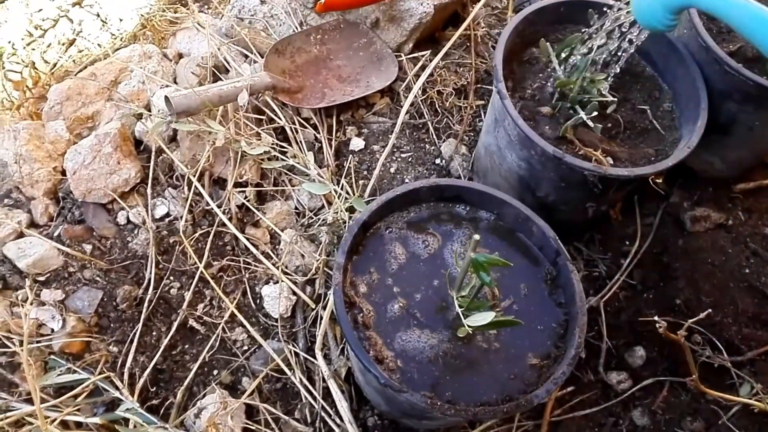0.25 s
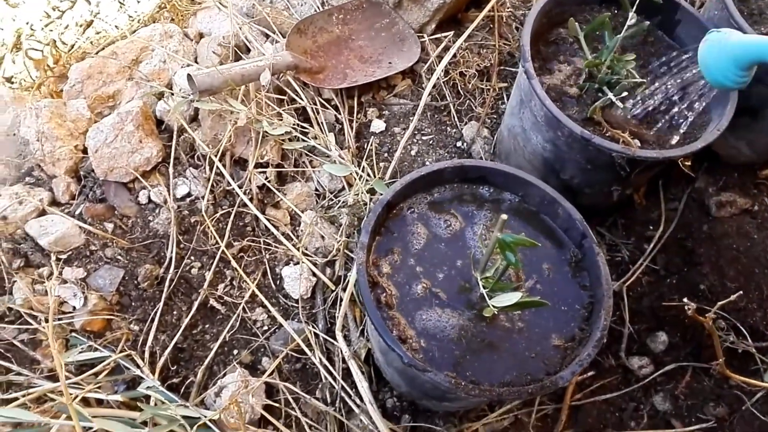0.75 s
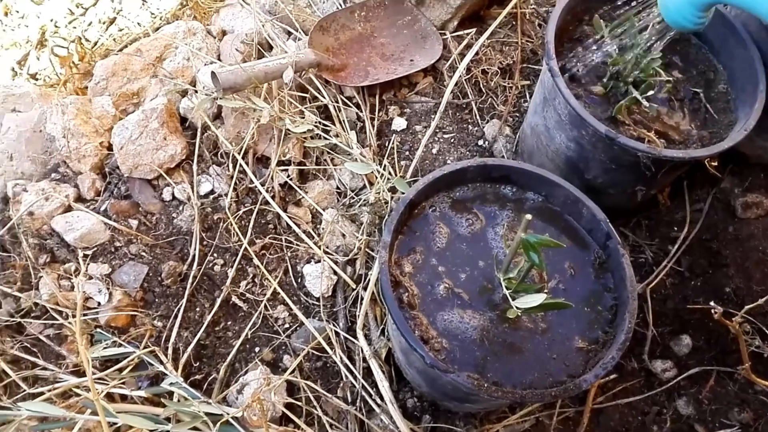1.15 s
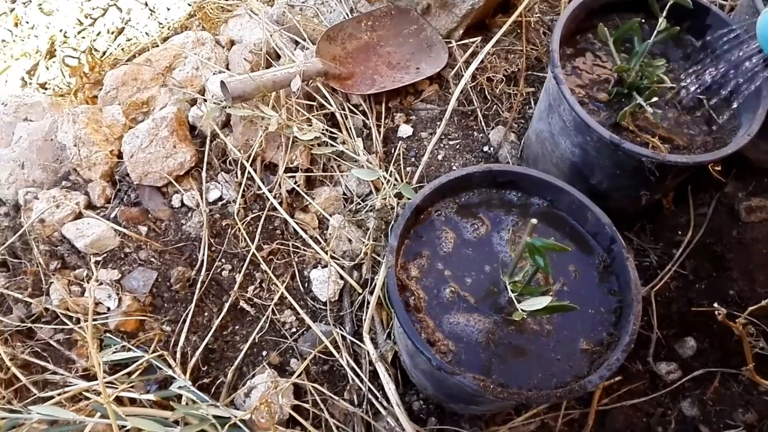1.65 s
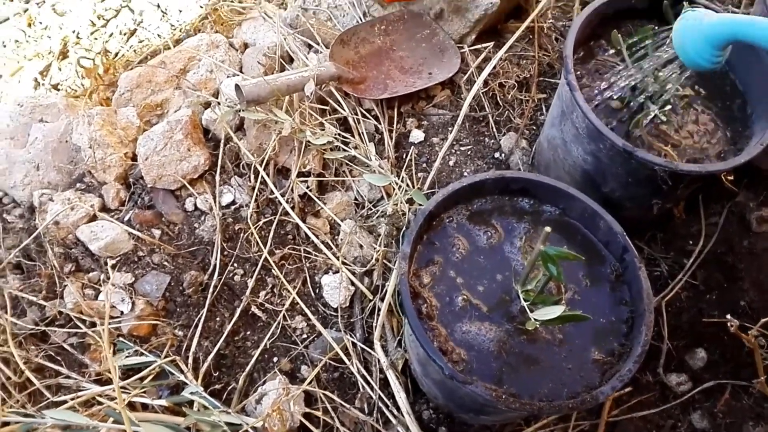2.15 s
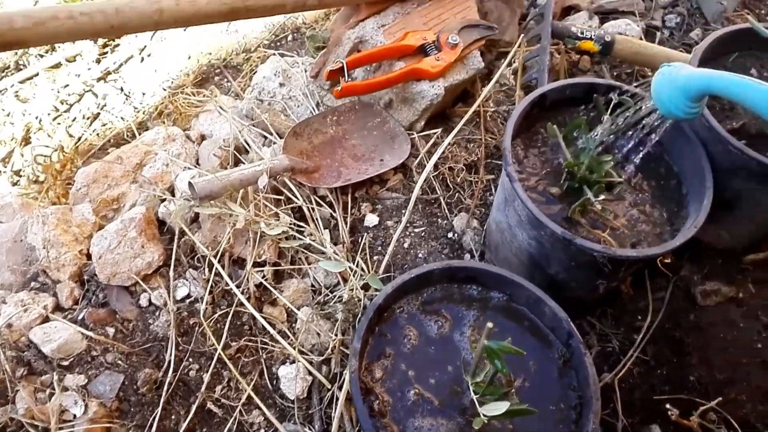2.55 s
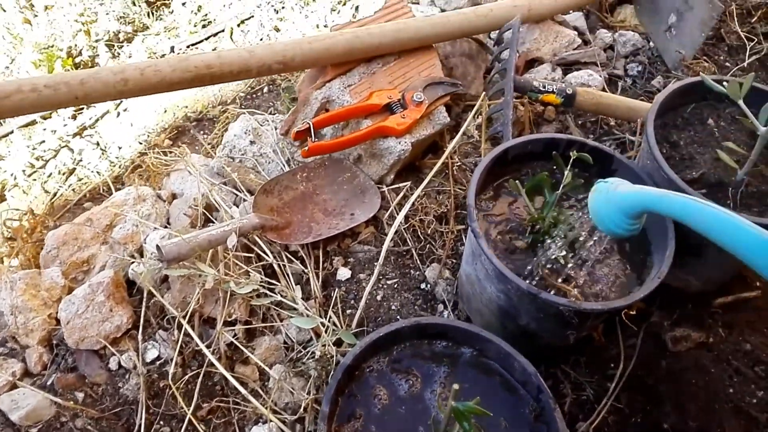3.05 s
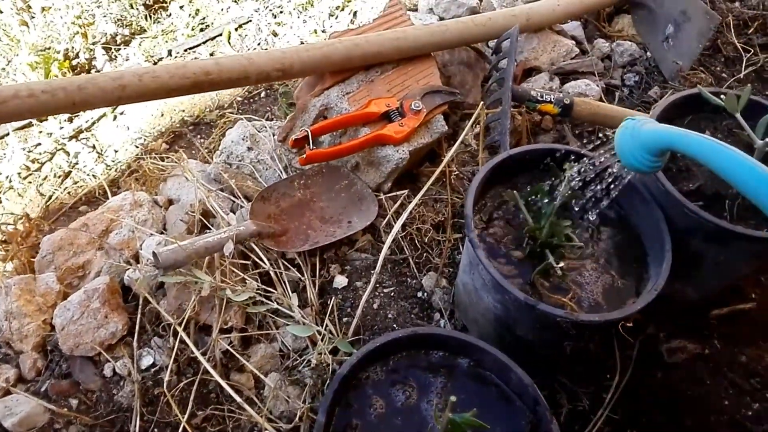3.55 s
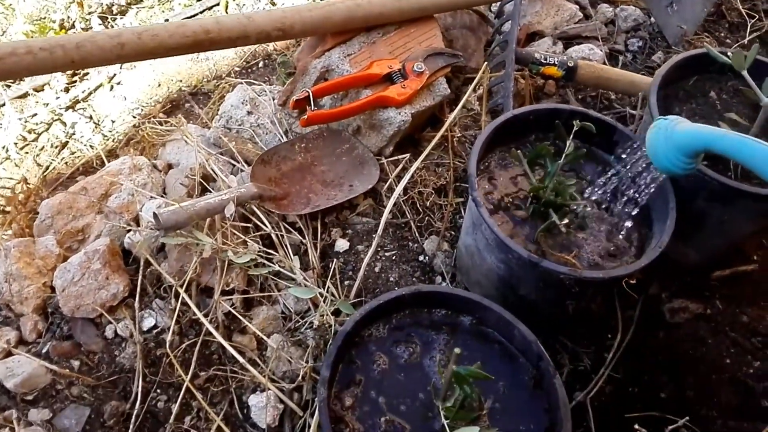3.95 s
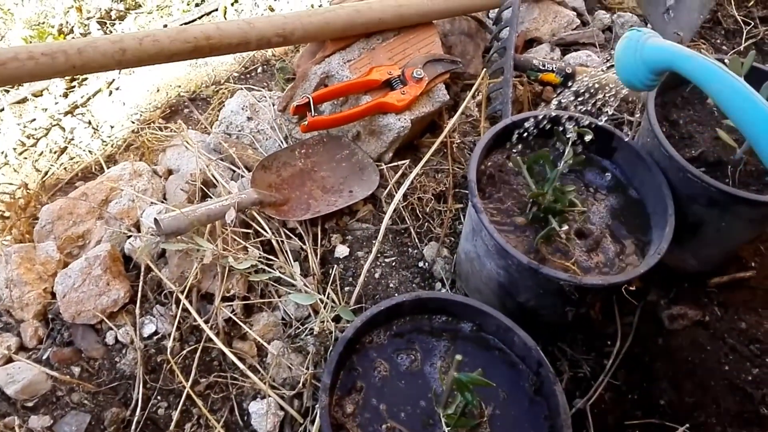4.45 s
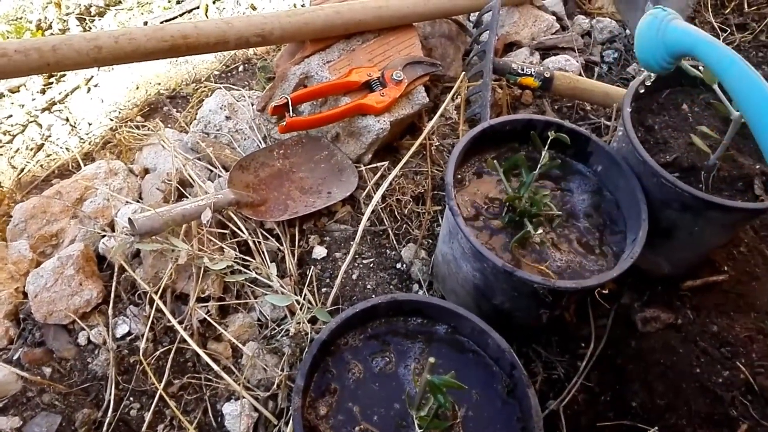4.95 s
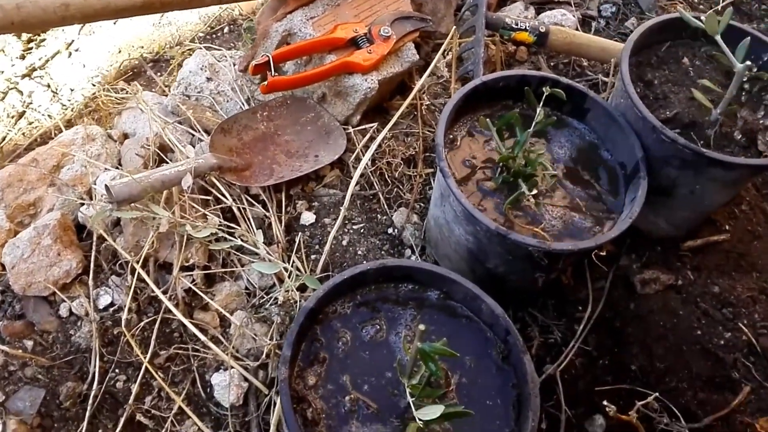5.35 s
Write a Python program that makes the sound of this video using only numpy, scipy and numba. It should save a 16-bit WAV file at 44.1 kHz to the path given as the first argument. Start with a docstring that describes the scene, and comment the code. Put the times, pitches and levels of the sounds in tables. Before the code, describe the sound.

Water from a watering can sprinkles in stop-and-start bursts onto small pots of wet soil outdoors, with bubbling plips and a faint low hum.

```python
"""A watering can sprinkles small plastic pots of wet soil outdoors, close to one end of a phone.
Drops on leaves and mud are short sine ticks with a noisy tail; bubbles in the puddle are longer, rising sines.
A far machine hum of two wavering partials sits over open-air rumble and hiss made of filtered noise.
The near (left) microphone port is lifted around 3 and 8 kHz; the far port hears the water late, dull and weak."""
import sys
import numpy as np
from scipy import signal
from scipy.fft import rfft, irfft, next_fast_len
from scipy.io import wavfile
from scipy.ndimage import uniform_filter1d
from numba import njit

SR = 44100
rng = np.random.default_rng(int(sys.argv[2]) if len(sys.argv) > 2 else 0)


def int16_out(signal):
    """Quantize to a 16-bit WAV file."""
    q = np.round(np.clip(np.atleast_2d(signal).T, -1, 1) * 32767)
    wavfile.write(sys.argv[1], SR, q.astype(np.int16))


N = 247401

# base level of the hum, which the gusts follow too: (time [s], level [dB])
HUM_LEVEL = [(0, -73), (.4, -69), (.48, -57.5), (.65, -67), (1.12, -62.5), (1.27, -57), (1.63, -54.5),
             (2.05, -76.5), (2.6, -75), (2.8, -59.5), (3.5, -47.5), (3.8, -53), (3.9, -70.5), (4.38, -64),
             (4.47, -56), (4.8, -49.5), (5.26, -66), (5.3, -49), (5.38, -64.5)]
PORT_LAG = 26  # samples that sound needs along the phone


def undb(db):
    """Decibels to amplitude."""
    return 10 ** (np.asarray(db) / 20)


def curves(table):
    """Columns of a table after the time, one value per sample."""
    s, *columns = np.transpose(table)
    return [np.interp(np.arange(N) / SR, s, column) for column in columns]


def colour(x, points):
    """Filter through (frequency [Hz], gain [dB]) points, joined on a log frequency axis."""
    hz, db = np.transpose(points)
    size = next_fast_len(N)
    log_hz = np.log(np.fft.rfftfreq(size, 1 / SR) + 1)
    gain = undb(np.interp(log_hz, np.log(hz), db))
    return irfft(rfft(x, size) * gain, size)[:N]


def unit(x):
    """Scale to rms 1."""
    return x / np.sqrt(np.mean(x ** 2))


def walk(rate):
    """Random level that ramps to a new value `rate` times a second; rms 1."""
    hold = int(SR / rate)
    steps = np.repeat(rng.standard_normal(N // hold + 1), hold)
    return unit(uniform_filter1d(steps, hold)[:N])


def water():
    """Ticks of impact, fine spray and bubbles: a statistical shower plus the loudest single drops."""
    tick_gain, bubble_gain, tick_pitch = swings()
    shower = sprinkle(tick_gain, tick_pitch)
    puddle = puddle_bubbles(bubble_gain)
    return shower + puddle + gurgling() + loud_drops()


def swings():
    """Gain of ticks and bubbles, and tick pitch: drops gather before a swing, pour steadily, trail weakly, stop."""
    # swings of the can over the pot: (start [s], end [s], trails on until [s], tick level [dB],
    # bubble level [dB], tick pitch [factor: low on mud, high on leaves])
    swing_table = [(0.692, 0.85, .93, -53, -77, 1.07), (1.283, 1.602, 1.58, -45, -65.5, 0.96),
                   (1.58, 2.184, 2.2, -44.5, -57.5, 0.98), (2.208, 2.499, 2.5, -51, -59.5, 0.91),
                   (2.528, 2.68, 2.7, -44.5, -51, 1.006), (2.702, 2.808, 2.82, -41, -54.5, 0.96),
                   (2.806, 2.915, 2.93, -39, -46, 1.02), (2.916, 3.118, 3.19, -46, -54.5, 1.114),
                   (3.354, 3.406, 3.43, -45, -48.5, 1.1), (3.424, 3.693, 3.69, -43.5, -52.5, 1.15),
                   (3.706, 4.248, 4.37, -41.5, -44, 1.03), (4.453, 4.586, 4.62, -50, -62, 1.06),
                   (4.637, 4.699, 4.73, -47.5, -54.5, 0.92), (4.722, 4.781, 5.11, -43.5, -62.5, 1.07)]
    lead_db, lead_db_per_s = -13.5, 96  # first drops before a swing, and how fast they gather
    trail_db, edge_s = -15.5, 0.015  # last drops after a swing; smoothing of all edges
    t = np.arange(N) / SR
    start, end, trail, tick_db, bubble_db, pitch = np.transpose(swing_table)[:, :, None]
    lead = undb(lead_db - lead_db_per_s * (start - t))
    tail = undb(trail_db) * (t < trail)
    shape = np.where(t < start, lead, np.where(t < end, 1, tail))
    gains = []
    for db in (tick_db, bubble_db):
        loudest = (shape * undb(db)).max(axis=0)
        gains.append(uniform_filter1d(loudest, int(edge_s * SR)))
    return *gains, pitch[shape.argmax(axis=0), 0]


def sprinkle(tick_gain, tick_pitch):
    """Each drop sounds a tick, a bright edge of spray and a lower slap at once."""
    spray_db, slap_db = -9, -12.5  # against the ticks
    dribble_db = -72.5  # what drips on from the rose between swings
    drops = rng.random((4500, 2)).T
    ticks = rain(count=4500, low_hz=6200.0, high_hz=9100.0, spread_db=5.5, cycles=2.7, glide=1.0,
                 sag=tick_pitch, drops=drops)
    spray = rain(count=4500, low_hz=10010.0, high_hz=14000.0, spread_db=5., cycles=2.5, glide=1, drops=drops)
    slap = rain(count=4500, low_hz=3600., high_hz=6200., spread_db=5., cycles=2.8, glide=1, drops=drops)
    # the jets break up unevenly, so drops come in bunches
    bunch = undb(2.4 * walk(70))
    mist = undb(3 * walk(25))
    impacts = bunch * (tick_gain + undb(dribble_db)) * (ticks + undb(slap_db) * slap)
    return impacts + mist * np.sqrt(bunch) * tick_gain * undb(spray_db) * spray


def puddle_bubbles(bubble_gain):
    """Trapped air rings and rises in pitch as it nears the surface; a deep puddle is louder and lower."""
    sag = 1 / (1 + 55 * bubble_gain)  # deeper water traps larger bubbles
    bubbles = rain(count=3200, low_hz=1850., high_hz=4600., spread_db=4., cycles=3.2, glide=1.05,
                   sag=sag, tilt_db=12)
    return bubble_gain * undb(2.9 * walk(60)) * bubbles


def gurgling():
    """A dense gurgle of low, rising bubbles near 1 kHz."""
    # (start [s], end [s], level [dB])
    start, end, db = (1.314, 2.12, -61.5)
    # negative spread: most bubbles equally loud, a few weaker
    gurgle = rain(count=1500, low_hz=832.0, high_hz=1180.0, spread_db=-5.0, cycles=2.66, glide=1.1)
    fade = curves([(start - .05, 0), (start + 0.021, 1), (end - .05, 1), (end + 0.036, 0)])[0]
    return fade * undb(db) * gurgle


def loud_drops():
    """The loudest ticks and bubbles with their droplets, and heavy low drops on mud."""
    # levels are those of one grain before splatter and port colour
    # loudest ticks: (splash time [s], peak level [dB], starting pitch [Hz])
    tick_table = [(0.2005, -40.5, 8300), (0.239, -37.5, 6800), (0.4686, -29, 7230), (0.6977, -27, 7400),
                  (0.7065, -27.5, 8100), (0.7175, -34, 7600), (0.7315, -26.5, 8400), (0.749, -38, 6960),
                  (0.7585, -27, 7000), (0.8165, -30, 8240), (0.829, -29, 6400), (0.84, -31, 6100),
                  (0.9007, -31.5, 7150), (0.9616, -16.5, 6300), (1.0777, -28, 7440), (1.251, -30, 6300),
                  (1.3796, -23.5, 7900), (1.4124, -21, 8900), (1.5718, -19.5, 7100), (1.6818, -18, 8900),
                  (1.7486, -23.5, 7200), (2.4441, -20.5, 8000), (2.5282, -22.5, 7050),
                  (2.6075, -20.5, 7360), (2.7177, -15.5, 8160), (2.774, -17, 7350), (2.8755, -11.5, 7600),
                  (3.0863, -15, 7900), (3.251, -33.5, 8500), (3.2841, -32.5, 8250), (3.3585, -19.5, 7900),
                  (3.4346, -13, 8460), (3.4745, -19.5, 8800), (3.488, -17, 7800), (3.5236, -20.5, 8200),
                  (3.5426, -17, 8800), (3.6346, -19.5, 8540), (3.6585, -23, 7860), (3.6707, -18, 9300),
                  (3.7275, -23, 7750), (3.7438, -14, 8350), (3.8193, -19, 8050), (3.8972, -20, 6770),
                  (4.0904, -16.5, 8500), (4.2725, -25, 7750), (4.4744, -18, 8100), (4.5113, -20, 9500),
                  (4.551, -12.5, 7300), (4.5669, -21, 7850), (4.6574, -18, 6580), (4.7358, -31, 7950),
                  (4.7665, -17.5, 8340), (4.8653, -13.5, 7770), (5.2924, -20.5, 8890), (5.3294, -26, 10100)]
    # loudest bubbles: (start [s], peak level [dB], starting pitch [Hz])
    bubble_table = [(1.6872, -27.5, 1870), (2.0507, -34, 2190), (2.16, -33, 2140), (2.4446, -37.5, 3060),
                    (2.459, -32.5, 1900), (2.5676, -33, 2160), (2.813, -34, 1750), (2.842, -31.5, 1794),
                    (2.947, -45, 532), (3.398, -27, 2140), (3.8064, -29.5, 1780), (3.9022, -27.5, 1690),
                    (3.9314, -25, 1640), (3.9865, -22, 1670), (4.052, -25, 1750), (4.1028, -24, 1695),
                    (4.297, -37.5, 3400), (4.4552, -35, 2270), (4.507, -40, 1930), (4.524, -35, 1970),
                    (4.6448, -36, 3270), (4.6857, -29, 1520), (4.7947, -33, 1316), (4.75, -51, 2430),
                    (4.8257, -37.5, 2240), (4.894, -40.5, 1690), (4.938, -30.5, 1610),
                    (4.9638, -40.5, 2300), (5.046, -40, 4400), (5.079, -44, 2676), (5.464, -36, 3900),
                    (5.465, -44, 1760)]
    # heavy drops on mud: (start [s], peak level [dB])
    thud_table = [(2.775, -30), (2.876, -33.5)]
    ticks = splashes(tick_table, count=5, spread_s=.007, drop_db=4, scatter_db=15,
                     low_hz=6500, high_hz=12500, cycles=3., glide=.98, delay_s=0.0011)
    bubbles = splashes(bubble_table, count=4, spread_s=.02, drop_db=10, scatter_db=10,
                       low_hz=1700, high_hz=2900, cycles=2.6, glide=1.035)
    s, db = np.transpose(thud_table)
    thuds = grains(s, db, np.full(len(s), 1100.), cycles=0.45, glide=1)
    return ticks + bubbles + thuds


def splashes(table, count, spread_s, drop_db, scatter_db, low_hz, high_hz, cycles, glide, delay_s=0):
    """A loud drop, delay_s after the splash time, sounds among smaller droplets, some of them earlier."""
    s, db, hz = np.transpose(table)
    late, weak, pitch = rng.random((len(s), count, 3)).T
    droplet = np.arange(count)[:, None] > 0  # row 0 is the loud drop itself
    s = s + delay_s + droplet * spread_s * (late - .4)
    db = db - droplet * (drop_db + scatter_db * weak)
    hz = np.where(droplet, low_hz + (high_hz - low_hz) * pitch, hz)
    return grains(s.ravel(), db.ravel(), hz.ravel(), cycles, glide)


def rain(count, low_hz, high_hz, spread_db, cycles, glide, sag=np.ones(N), tilt_db=0, drops=None):
    """Drops at random (or given) places and size ranks; sag scales pitch over time, tilt weakens highs; rms 1."""
    place, rank = rng.random((count, 2)).T if drops is None else drops
    pitch = rng.random(count)
    # with a positive spread most drops are small and a few large
    db = np.minimum(-spread_db * np.log(1 - rank), 2.9 * spread_db) - tilt_db * pitch
    hz = low_hz * (high_hz / low_hz) ** pitch * sag[(place * N).astype(int)]
    return unit(grains(place * N / SR, db, hz, cycles, glide))


def grains(s, db, hz, cycles, glide):
    """Rings whose length and glide vary at random around the given ones."""
    length_chance, glide_chance = rng.standard_normal((len(s), 2)).T
    start = (s * SR).astype(np.int64)
    cycles = cycles * np.exp(0.27 * length_chance)
    return ring(N, start, 1. * hz, cycles, glide ** np.abs(glide_chance), undb(db))


@njit
def ring(n, start, hz, cycles, glide, size):
    """Sines that swell for some cycles, then fade; pitch multiplies by glide in each such span."""
    out = np.zeros(n)
    for k in range(len(start)):
        swell = cycles[k] / hz[k]  # seconds
        phase = 0.
        for i in range(start[k], min(n, start[k] + int(6 * swell * SR))):
            t = (i - start[k]) / SR / swell
            phase += 2 * np.pi * hz[k] * glide[k] ** t / SR
            out[i] += size[k] * (t * np.exp(1 - t)) ** 2 * np.sin(phase)
    return out


def splatter(x, t60_s, db, count=4):
    """Pot walls and leaves scatter each drop into a short noisy tail, which hops at random among a few noise tails."""
    t = np.arange(SR // 20) / SR
    tails = rng.standard_normal((count, len(t))) * 10 ** (-3 * t / t60_s)
    tails = tails / np.sqrt(np.sum(tails[0] ** 2))
    # draw a tail every 256 samples, with short crossfades
    spot = np.repeat(rng.integers(0, count, N // 256 + 1), 256)[:N]
    share = np.array([uniform_filter1d(1. * (spot == k), size=128) for k in range(count)])
    wet = signal.oaconvolve(x * share, tails, axes=1)
    return x + undb(db) * wet.sum(axis=0)[:N]


def water_at_ports(drops):
    """Splatter and colour of the water at each port; it reaches the far one later."""
    # how each port colours the water: (frequency [Hz], gain [dB])
    near_port = [(1700, -3), (3000, 4.5), (4000, -2), (5500, -3), (7500, 1.5), (8600, 2), (10500, -9.5),
                 (14100, -7.5), (14700, -20), (15700, -17)]
    far_port = [(600, -2), (1700, -19.5), (3000, -15), (4000, -16.5), (8000, -32.5), (10000, -37),
                (14000, -41), (14700, -67)]
    near = splatter(drops, t60_s=.028, db=-8)
    far = splatter(drops, t60_s=.06, db=2.5)
    return np.array([colour(near, near_port), colour(np.roll(far, PORT_LAG), far_port)])


def hum():
    """Two wavering partials of a far machine; a passing lower neighbour beats with the fundamental."""
    # base pitch: (time [s], frequency [Hz])
    pitch_table = [(1.9, 98.4), (2.6, 96.58)]
    # base level of the octave partial: (time [s], level [dB])
    octave_table = [(0.0, -87), (0.51, -68), (1.14, -83.5), (1.27, -64), (2.62, -80.5), (3.12, -61),
                    (3.25, -94), (4.08, -58.5), (4.22, -70), (5.61, -99)]
    # the slightly lower tone that comes and goes: (deepest dip [s], lasts +- [s],
    # distance below the hum at the dip [Hz], drift of that distance [Hz/s], level against the hum [dB])
    beat_table = [(1.48, 0.28, 9, 8.9, -1), (4.743, 0.53, 9.05, 18, -1.5)]
    hz = curves(pitch_table)[0] * (1 + 0.0035 * walk(7.2))
    low_db = curves(HUM_LEVEL)[0] + 1.6 * walk(24)
    octave_db = curves(octave_table)[0] + 3.2 * walk(26)
    port_phase = np.array([[0], [.3]])  # radians
    phase = 2 * np.pi * np.cumsum(hz) / SR + port_phase
    low = np.sin(phase)
    for s, span, below, drift, db in beat_table:
        t = np.arange(N) / SR - s
        lag = 2 * np.pi * (below * t + drift * t ** 2 / 2)
        low -= undb(db) * np.exp(-(t / span) ** 2) * np.sin(phase - lag)
    partials = undb(low_db) * low + undb(octave_db) * np.sin(2 * phase)
    return np.sqrt(2) * partials * undb([[.6], [-.6]])  # near port slightly louder


def gusts():
    """The lowest rumble, band-passed noise, swells with the hum; partly unrelated at the ports."""
    noise = rng.standard_normal((3, N))
    band = signal.butter(2, [36, 230], "band", fs=SR, output="sos")
    low = signal.sosfilt(band, noise[0] + .5 * noise[1:])
    return unit(low) * undb(0.71 * curves(HUM_LEVEL)[0] - 28.0 + 3.5 * walk(11))


def air(shared):
    """Distant rumble and hiss whose shared part (a power fraction) reaches the far port first."""
    # open air as each port hears it: (frequency [Hz], density [dB per Hz])
    near_spectrum = [(25, -112), (60, -93), (150, -88.5), (400, -98.5), (850, -102), (1800, -102),
                     (4800, -111), (7500, -104), (10500, -118), (14100, -120), (14800, -138)]
    far_spectrum = [(25, -113), (60, -99), (150, -89.5), (400, -99), (1000, -100), (8000, -116),
                    (14100, -121), (14800, -138)]
    common, left, right = rng.standard_normal((3, N)) * np.sqrt(SR / 2)  # 0 dB per Hz
    shared = np.clip(shared, 0, 1)
    near = np.sqrt(shared) * np.roll(common, PORT_LAG) + np.sqrt(1 - shared) * left
    far = np.sqrt(shared) * common + np.sqrt(1 - shared) * right
    return np.array([colour(near, near_spectrum), colour(far, far_spectrum)])


def scene():
    """Water, hum, gusts and open air at the near and far port."""
    return water_at_ports(water()) + hum() + gusts() + air(shared=0.21)


def record(dry):
    """The phone cuts the top with a steep low-pass at 15.7 kHz."""
    return signal.sosfilt(signal.ellip(10, .2, 70, 15700, fs=SR, output="sos"), dry)


dry = scene()
out = record(dry)
int16_out(out)
```